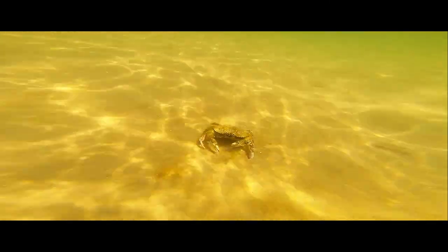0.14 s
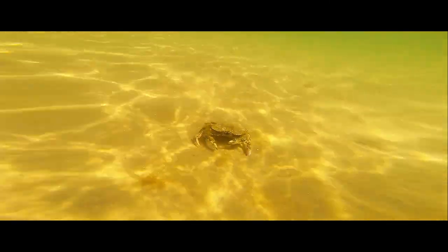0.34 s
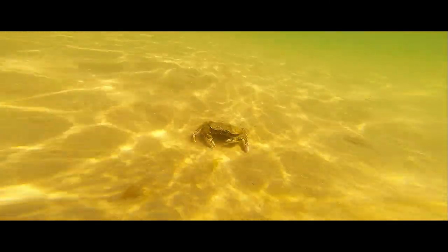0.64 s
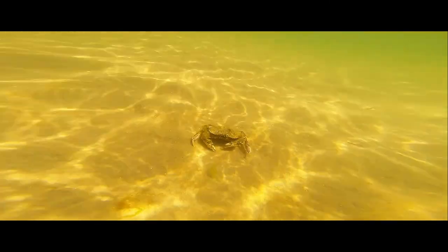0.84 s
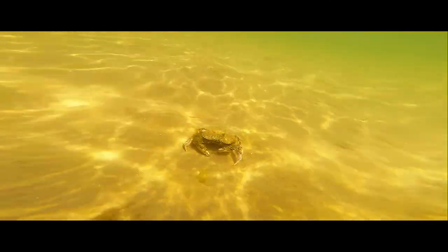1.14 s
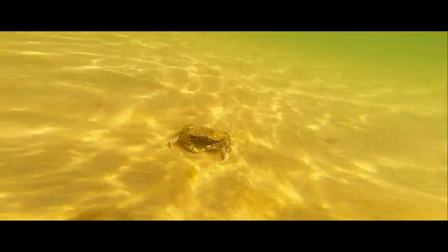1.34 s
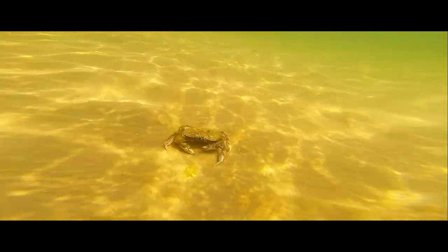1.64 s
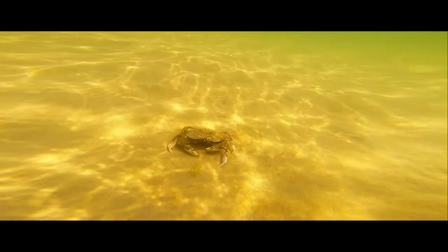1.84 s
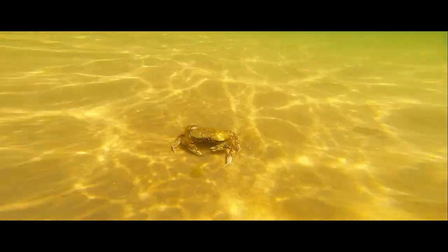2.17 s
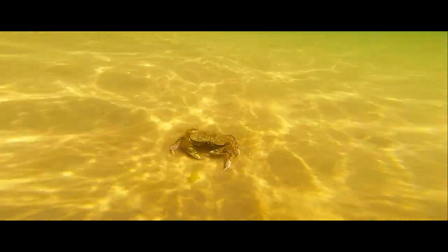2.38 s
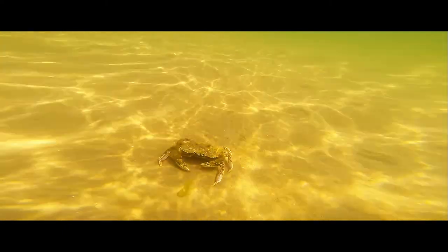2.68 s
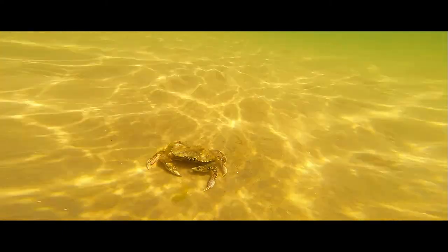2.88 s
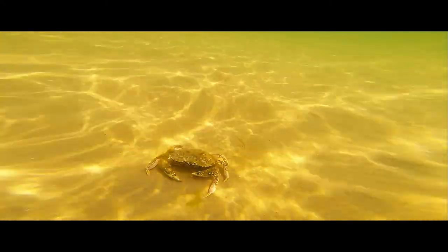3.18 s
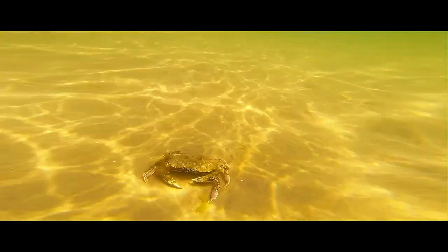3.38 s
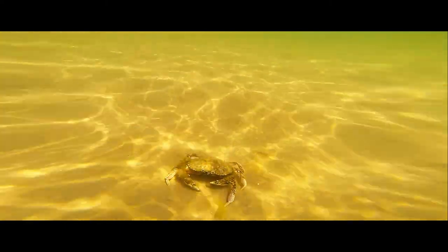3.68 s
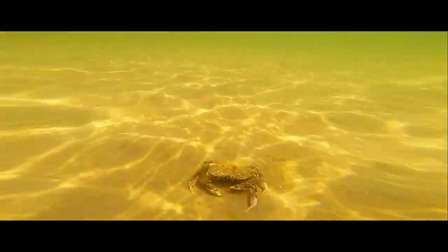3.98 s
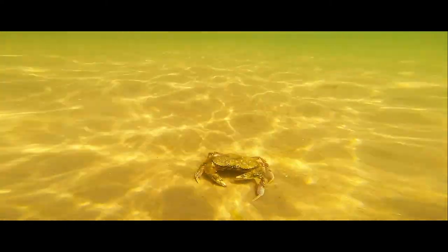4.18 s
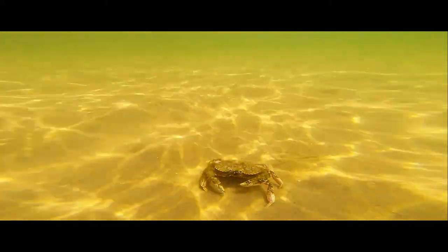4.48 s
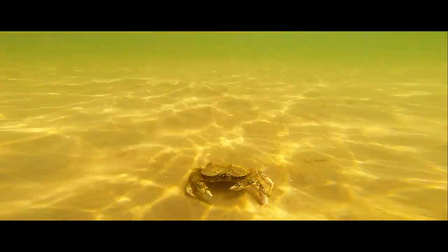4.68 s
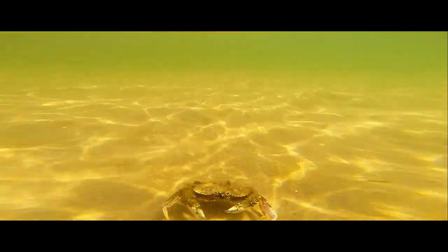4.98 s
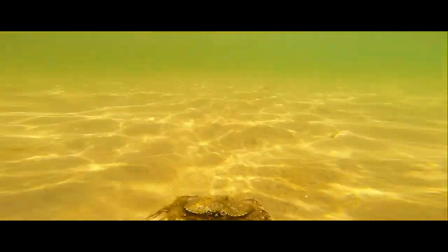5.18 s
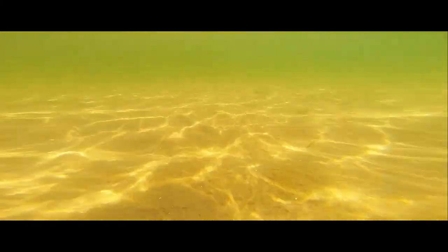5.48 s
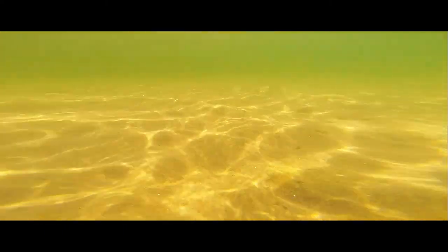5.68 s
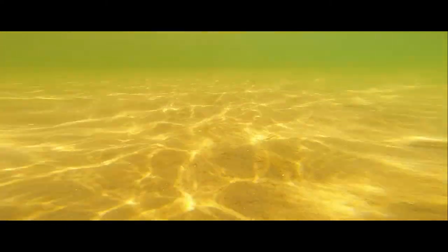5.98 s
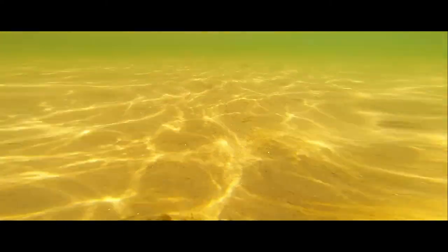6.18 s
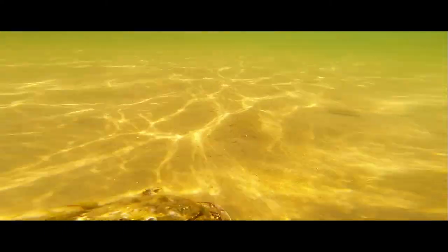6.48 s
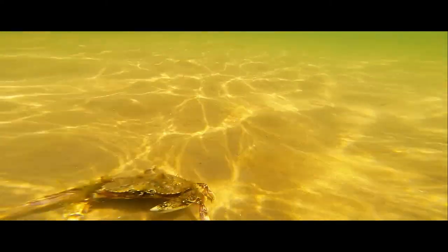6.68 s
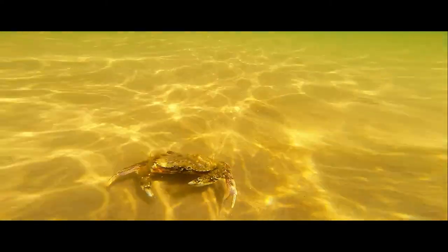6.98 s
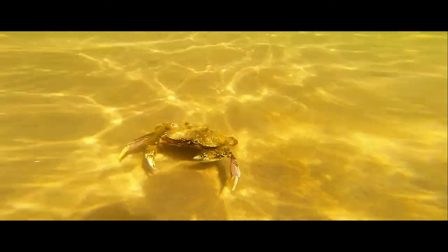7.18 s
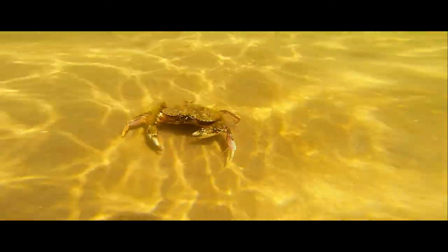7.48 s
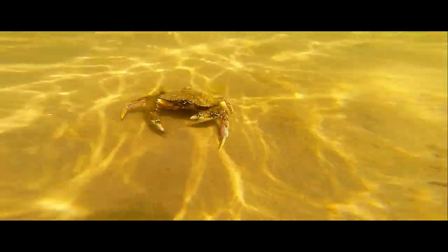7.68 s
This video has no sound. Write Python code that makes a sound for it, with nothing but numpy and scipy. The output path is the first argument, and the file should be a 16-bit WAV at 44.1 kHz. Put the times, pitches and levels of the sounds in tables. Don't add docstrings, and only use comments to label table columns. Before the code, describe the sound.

Close dry clicks and soft bumps over faint hiss and low water swell, ending in a violent rattle of plastic knocks and rubbing.

```python
import sys
import numpy as np
from scipy import signal
from scipy.fft import rfft, irfft
from scipy.io import wavfile
from scipy.ndimage import uniform_filter1d, minimum_filter1d

SR = 44100
rng = np.random.default_rng(int(sys.argv[2]) if len(sys.argv) > 2 else 0)


def invert_db(level):
    return 10 ** (np.asarray(level, dtype=float) / 20)


def put_to_file(sound):
    columns = np.atleast_2d(sound).T
    safe = np.clip(columns, -1, 1)
    whole_steps = np.round(safe * 32767)
    wavfile.write(sys.argv[1], SR, whole_steps.astype(np.int16))


N = 345303


def rms_one(x):
    return x / np.sqrt(np.mean(x ** 2) + 1e-20)


def in_time(rows):
    s, *columns = np.transpose(rows)
    return [np.interp(np.arange(N) / SR, s, c) for c in columns]


def drift(rate):
    r = np.exp(-80 * np.pi * rate / SR)
    slow = signal.lfilter([1], [1, -2 * r, r * r], rng.standard_normal(N // 40 + 2002))
    slow = rms_one(slow[2000:])
    return np.interp(np.arange(N) / 40, np.arange(len(slow)), slow)


def ring(clicks, hz, t60):
    r, w = invert_db(-60 / (t60 * SR)), 2 * np.pi * hz / SR
    return signal.lfilter([0, np.sin(w)], [1, -2 * r * np.cos(w), r * r], clicks + 1e-18)


def clicks_at(times, sizes):
    samples = np.round(np.asarray(times) * SR).astype(int)
    return np.bincount(np.minimum(samples, N - 1), sizes, N)


def soften(x, hz):
    return signal.sosfilt(signal.butter(2, hz, fs=SR, output="sos"), x)


def coloured(spectrum):
    hz, level_db = np.transpose(spectrum)
    log_hz = np.log(np.arange(1, N // 2 + 2) * SR / N)
    gain = invert_db(np.interp(log_hz, np.log(hz), level_db))
    return rms_one(irfft(rfft(rng.standard_normal(N)) * gain, N))


def fading_levels(rows):
    t = np.arange(N) / SR
    return sum(invert_db(level_db) * np.clip(np.minimum(t - start, end - t) / 0.017, 0, 1)
               for start, end, level_db in rows)


def joint(rub_db):
    # time in
    # seconds, peak in dB.
    slips = [(0.1875, -34), (0.207, -41), (0.213, -33.7), (0.2226, -42.0), (0.4129, -31),
             (0.4156, -34.5), (0.4283, -32.5), (0.431, -47), (0.4356, -43), (0.4383, -39),
             (0.4458, -41), (0.776, -51), (1.053, -44), (1.061, -42.0), (1.069, -49), (1.0771, -38.5),
             (1.1498, -43.5), (1.1681, -44), (1.1787, -40.5), (1.189, -48), (1.198, -46),
             (1.2045, -51), (1.211, -48), (1.533, -33.5), (1.542, -41), (1.585, -49.0), (1.608, -45),
             (1.6812, -40.5), (1.7, -48.0), (1.719, -46), (1.7648, -44), (1.778, -44), (3.062, -49),
             (3.072, -57), (3.085, -43.2), (3.0924, -46), (3.0983, -40), (3.1024, -52), (3.1069, -35),
             (3.115, -41.6), (3.1192, -42), (3.1253, -41), (3.1365, -38), (3.1458, -41),
             (3.1492, -42), (3.1542, -45), (3.1631, -42), (3.1666, -39), (3.1729, -39.0),
             (3.1806, -37.3), (3.1863, -33), (3.1944, -28), (3.2024, -40), (3.2054, -29.5),
             (3.2075, -36), (3.2203, -35), (3.225, -28.5), (3.2288, -36.5), (3.2332, -48),
             (3.4009, -23.5), (3.4091, -26.5), (3.4182, -32), (3.4214, -26), (3.429, -32),
                   (3.4324, -36.4), (3.4356, -38), (3.4384, -48), (3.451, -44), (3.9081, -29.2),
                   (3.9275, -37.5), (3.972, -51), (4.1695, -38), (4.193, -59), (4.216, -55),
                   (4.2915, -45.8), (4.4535, -42), (4.4712, -37.5), (4.4996, -40), (4.513, -39),
                   (4.5255, -40), (4.5405, -41), (4.5438, -43), (4.556, -42), (4.59, -47), (4.6, -36.5),
                   (4.6149, -38.5), (4.64, -43.5), (4.648, -45), (4.6621, -45), (4.678, -46.0),
                   (4.728, -40), (4.745, -35), (4.7595, -34), (4.773, -40), (4.787, -39), (4.8025, -35),
                   (4.8133, -40), (4.8276, -41.5), (4.84, -40), (4.8623, -38.5), (5.0696, -34.5),
                   (5.0895, -42.3), (5.1984, -39), (5.2361, -43), (5.241, -40.5), (5.2557, -39),
                   (5.2712, -34), (5.2871, -30), (5.3168, -34.5), (5.332, -41), (5.5733, -38.5),
                   (6.1117, -41.5), (6.128, -46), (6.468, -44.5),
             (6.7075, -42), (6.7141, -44), (6.742, -30), (6.7518, -39), (6.7615, -17), (6.7666, -17.5),
                  (6.7718, -21.5), (6.779, -22), (6.7851, -34), (6.7882, -37), (6.7922, -34),
                  (6.813, -41.0), (6.8521, -41), (6.8798, -48), (6.889, -38), (6.901, -46), (6.9419, -41.5),
                  (6.9449, -38.6), (6.9661, -32.5), (6.99, -21.5), (6.9948, -12.5), (7.0003, -3.5),
                  (7.003, -20), (7.0058, -17), (7.023, -13), (7.026, -19), (7.0376, -14), (7.0403, -2),
                  (7.0455, -13), (7.0505, -10), (7.0546, -12.5), (7.056, -11.5), (7.0592, -20.4),
                  (7.0627, -26.5), (7.0666, -24), (7.0741, -43),
             (7.0873, -40), (7.1029, -35), (7.1062, -35), (7.1112, -43.3), (7.1151, -31),
                  (7.1527, -41), (7.1582, -46.2), (7.1635, -35), (7.1666, -44), (7.1705, -32.5),
                  (7.1727, -32.5), (7.178, -46), (7.181, -29.5), (7.1898, -28.5), (7.1972, -26),
                  (7.2025, -42), (7.2086, -27), (7.2126, -33), (7.2177, -34.2), (7.2214, -34),
                  (7.2264, -41), (7.2298, -39), (7.2333, -45), (7.2368, -43), (7.2402, -42),
                  (7.2447, -45.3), (7.2712, -40), (7.2764, -37), (7.2794, -36), (7.2819, -36),
                  (7.2869, -41), (7.2917, -46), (7.2952, -37.4), (7.2999, -35.1), (7.3058, -33.5),
                  (7.319, -38.5), (7.567, -36), (7.58, -46.0), (7.591, -48.5), (7.76, -50), (7.8, -49.5),
                  (7.8145, -46),
             (6.7315, -47), (6.748, -42), (6.981, -38.5), (6.988, -30.5), (6.9925, -13.5),
                  (7.0085, -27), (7.033, -22), (7.0352, -15), (7.043, -10), (7.048, -10), (6.91, -43),
                  (6.8635, -39), (6.82, -43), (8.9, -44), (5.3, -43), (0.21, -46), (.235, -49),
                  (.4415, -44), (.451, -47), (3.56, -46)]
    # start in seconds, low walls in dB,
    # middle wall in dB, brightness in dB, top modes in dB.
    bearing_rows = [(0, -10, 6, 3, 7), (.3, -5, 7.5, 5, 9), (.422, -4, 4, 4, -4), (.7, -19, 9, 1, -3),
                    (1.0, -2, 0, 7, -6), (1.12, -1, -2, 0, -6), (1.4, -8, 3, 1, 7), (1.56, -6, 2, -12, -3),
                    (3.0, -11.5, 5, -4, -5), (3.184, -8, 6.5, 5.5, 11), (3.3, -15, -5, 5.5, -12),
                    (3.406, -3, -1.5, 1, -12), (3.8, -5.5, 1, 2, -10), (4.1, -19, 2, -2, -3),
                    (4.4, -4.5, 0.5, -4, -10), (4.7, 1, -7, -3.5, -10), (4.855, -3, 4, 9, 14),
                    (5.0, -5, 3, 0, -8), (5.22, -3.5, -3.5, -1, -13), (5.5, -4, 0.5, -7, -3),
                    (6.6, -11, -3, -14, -8), (6.757, -11.5, 2, -5.5, -5), (6.776, 0.5, -4, -7.5, -8),
                    (6.93, -6, -0.5, -2.5, -2), (6.985, -8, -10.5, -9, -7.5), (6.998, -10, 6, -2, -7),
                    (7.015, -16, 2, -2, -1.5), (7.03, -11, -4, -3.5, -4.5), (7.038, -16.5, 3, 2, 7),
                    (7.043, -10, 6, 3, -0.5), (7.052, -10.5, 2.5, 1, -6), (7.058, -1.5, 1, -4, -5),
                    (7.08, -6.5, -5, -1, -11), (7.155, -4.5, 6, 8.5, 5), (7.204, -1.5, 3.5, 7.5, 3),
                    (7.26, -2, -1, 3, -11), (7.5, -7, -11, -2.5, -5), (7.7, 3, -21, 8, 1)]
    # pitch in Hz, level in dB, t60 in seconds.
    low_walls = [(344, -11.5, 0.004), (556, -2, 0.019), (672, -2.5, 0.022), (854, -1, 0.013)]
    high_walls = [(1250, -17, 0.017), (1464, -4, 0.02), (1900, -4, 0.011), (2225, -10.5, 0.022),
                  (2490, -8, 0.018), (2918, -11.5, 0.01), (3860, -25, 0.012), (4080, -21, 0.011),
                  (5030, -25.5, 0.01), (5600, -32, 0.0063), (6940, -26.5, 0.012), ]
    low_signs, high_signs = [1, -1, 1, 1], [1, 1, -1, 1, -1, 1, -1, -1, 1, -1, 1]
    # start in seconds, end in seconds, level in dB.
    gurgles = [
        (1.8, 3.2, -81),
        (2.505, 2.3, -58.5),
        (2.68, 2.83, -66),
        (4.24, 4.3, -61),
        (5.5, 4.1, -54),
        (5.23, 5.35, -62),
        (6.93, 6.975, -50.5),
        (6.09, 6.15, -60.5),
        (3.46, 3.55, -63.5),
        (1.145, 1.262, -64),
    ]
    s, peak_db = np.transpose(slips)
    since, *bearing = np.transpose(bearing_rows)
    row = np.maximum(np.searchsorted(since, s) - 1, 0)
    low_db, middle_db, bright_db, top_db = np.array(bearing)[:, row]
    s, peak_db = s - 0.00017, peak_db + 1
    top_db = top_db + 0.2 * np.clip(peak_db + 25.5, -20, 0)
    tiny_sizes = invert_db(2.1 * rng.exponential(1, N).clip(0, 2.5)) * rng.choice([-1, 1], N)
    tiny = (rng.random(N) < 450 / SR) * tiny_sizes
    scatter_db = 1.4 * rng.normal(0, 1, (len(s), 15))
    drag = scraping() * tiny
    dull_drag = soften(drag, 2300)
    gurgle = fading_levels(gurgles)
    murmur = (invert_db(rub_db - 7.5) + gurgle) * tiny + invert_db(-6.0) * drag
    low, high = np.zeros(N), np.zeros((2, N))
    for k, (hz, level_db, t60) in enumerate(low_walls):
        strikes = clicks_at(s, invert_db(peak_db + low_db + level_db + scatter_db[:, k]))
        low += low_signs[k] * ring(strikes + invert_db(level_db) * murmur, hz, t60)
    for k, (hz, level_db, t60) in enumerate(high_walls):
        tilt_db = [0, 0, middle_db, 1.3 * bright_db, bright_db, bright_db, top_db][min(k, 6)]
        strikes = clicks_at(s, invert_db(peak_db + level_db + tilt_db + scatter_db[:, 4 + k]))
        high[k // 6] += high_signs[k] * ring(strikes + invert_db(level_db + 2.0) * dull_drag, hz, t60)
    low += ring(gurgle * tiny, low_walls[2][0], 0.044)
    walls = soften(soften(low, 1400), 2400)
    walls = walls + soften(soften(soften(high[0], 3600) + high[1], 3800), 4200)
    return signal.sosfilt(signal.butter(2, 300, "high", fs=SR, output="sos"), walls)


def scraping():
    # start in seconds, end in seconds, level in dB.
    drags = [(-.02, 0.024, -49), (0.745, 0.787, -61), (1.147, 1.235, -59), (1.438, 1.563, -59.5),
             (1.558, 1.657, -58), (1.666, 1.837, -64), (3.055, 3.196, -51), (3.55, 3.583, -55.5),
             (3.906, 4.022, -53.5), (4.142, 4.316, -57), (4.629, 4.693, -60), (5.965, 5.993, -54),
             (6.087, 6.155, -62.5), (6.18, 6.276, -62), (6.698, 6.977, -51.5), (7.093, 7.144, -53),
             (7.56, 7.607, -63), (7.745, 7.851, -56)]
    return invert_db(-85) + fading_levels(drags)


def grip(rub_db):
    # time in seconds, peak in dB.
    thumps = [(4.9196, -32.5), (4.9919, -31), (5.31, -30), (5.4945, -27.5), (5.523, -29.5), (5.6597, -27),
              (5.7258, -35.5), (5.748, -32), (5.8243, -35.5), (5.881, -31.5), (6.007, -30), (6.139, -32.5),
              (6.209, -31), (6.2532, -31.5), (6.299, -34), (6.463, -34.5), (6.712, -35), (6.778, -18),
              (6.8363, -28.5), (6.868, -30), (6.988, -33), (6.9994, -23), (7.057, -29), (7.089, -35),
              (7.158, -34.5), (7.7528, -18), (7.76, -30), (7.772, -29)]
    # time in seconds, peak in dB.
    weaker_thumps = [(0.427, -54), (0.552, -59), (0.92, -59), (0.993, -53), (1.051, -42.5), (1.143, -46),
                     (1.198, -47), (1.26, -46), (1.295, -45), (1.492, -47), (1.715, -40), (1.77, -42.5),
                     (1.861, -39.5), (1.966, -47), (2.008, -46), (2.131, -40.5), (2.253, -48), (2.294, -57),
                     (2.41, -52), (2.458, -44), (2.488, -43.5), (2.561, -47), (2.664, -50), (2.729, -44),
                     (2.808, -44.5), (2.864, -45.5), (2.968, -36), (3.087, -44.5), (3.199, -46), (3.398, -38.5),
                     (3.519, -51), (3.616, -52), (3.706, -42), (3.779, -49), (3.905, -44), (3.982, -41),
                     (4.104, -39), (4.153, -45), (4.248, -38), (4.479, -54), (4.533, -48), (4.582, -38.5),
                     (4.771, -50), (4.802, -48), (4.838, -41),
                     (0.001, -40.5), (0.1767, -42), (4.962, -42), (5.4121, -38), (5.574, -47), (5.676, -46),
                          (6.0628, -40), (6.172, -39), (7.0286, -46), (7.211, -37.5)]
    grip_hz = 152.7
    s, peak_db = np.transpose(thumps + [(s, 2.5 + level_db) for s, level_db in weaker_thumps])
    jolts = soften(soften(clicks_at(s - .0006, -invert_db(peak_db)), 250), 210)
    shove = invert_db(-6) * ring(jolts, 95, .055)
    pushes = rng.standard_normal(N) * invert_db(2.2 * drift(25))
    stirring = invert_db(-60.5 + 0.57 * (rub_db + 64)) * rms_one(ring(soften(pushes, 220), grip_hz, 0.07))
    return ring(jolts, grip_hz, 0.15) + shove + stirring


def pops():
    # time in seconds, peak in dB, pitch in Hz.
    air_pops = [(3.857, -38.5, 3020), (3.859, -43.5, 3500), (3.858, -53, 4140), (4.108, -40, 594),
                (4.442, -51, 480), (4.737, -39, 576), (5.115, -41.5, 910), (5.957, -40, 697),
                (5.975, -40.5, 700), (6.098, -40, 657), (6.286, -38, 523), (6.2875, -30.5, 780),
                (6.289, -32, 1520), (6.2934, -30, 1480), (6.949, -30, 274), (6.318, -32.5, 700),
                (6.318, -41.5, 1500)]
    out = np.zeros(N)
    for s, peak_db, hz in air_pops:
        push = soften(soften(clicks_at([s], [invert_db(peak_db)]), 1.7 * hz), 0.74 * hz)
        out += ring(push, hz, 0.033 + 10.6 / hz)
    return out


def groans():
    # start in seconds, end in seconds, level in dB, pitch in Hz.
    air_groans = [
        (4.285, 4.358, -61, 470),
        (4.35, 4.406, -61, 480),
        (4.4, 4.47, -58, 490),
        (6.83, 6.97, -56, 330),
        (6.856, 6.969, -48.5, 434),
        (7.145, 7.268, -56.5, 302.5),
        (7.782, 7.86, -51.5, 300),
        (4.17, 4.3, -69, 430),
    ]
    return sum(fading_levels([row[:3]]) * rms_one(ring(rng.standard_normal(N), row[3], 0.03))
               for row in air_groans)


def bubble():
    start_s, start_hz, rise_per_s, fade_s = 4.733, 480, 66, 0.0046
    t = np.clip(np.arange(N) / SR - start_s, 0, .03)
    turns = start_hz * np.expm1(rise_per_s * t) / rise_per_s
    swell_and_fade = np.e * t / fade_s * np.exp(-(t / fade_s) ** 2)
    return invert_db(-34.5) * swell_and_fade * np.sin(2 * np.pi * turns)


def ticks():
    # time in seconds, peak in dB.
    grain_ticks = [
        (1.7554, -54),
        (3.8574, -54),
        (4.8628, -52),
        (5.57, -53),
        (6.287, -58),
        (7.241, -49),
        (7.5032, -50),
    ]
    s, peak_db = np.transpose(grain_ticks)
    hits = clicks_at(s, invert_db(peak_db))
    return invert_db(6.5) * ring(hits, 5200, 0.0027) - invert_db(-3.0) * ring(hits, 8800, 0.0034)


def spray():
    start_s, end_s, band_hz = 6.88, 7.22, (8500, 11900)
    t = np.arange(N) / SR
    grains = rng.standard_normal(N) * invert_db(4.0 * drift(40))
    band = signal.sosfilt(signal.butter(2, band_hz, "band", fs=SR, output="sos"), grains)
    fade = np.clip(np.minimum(t - start_s, end_s - t) / .06, 0, 1)
    return invert_db(-74) * fade * rms_one(band)


def swell(swell_db):
    # frequency in Hz, level in dB per Hz.
    swell_spectrum = [(10, 2), (22, 2), (45, 1), (75, -11.5), (110, -8), (180, -18), (300, -52.5),
                      (2000, -110)]
    return invert_db(swell_db + 1.8 * drift(25.0)) * coloured(swell_spectrum)


def circuit():
    # start in seconds, length in seconds, kind.
    memory_writes = [(.56, .105, 0), (.665, .013, 1), (.745, .355, 1), (1.126, .112, 1), (1.25, .048, 0),
                     (1.398, .038, 2), (3.205, .06, 0), (3.346, .055, 0), (3.481, .065, 1),
                     (3.614, .062, 1), (3.76, .105, 0), (3.9, .048, 1), (4.031, .052, 1), (4.197, .054, 1),
                     (4.32, .052, 1), (4.483, .05, 1), (4.599, .05, 1), (4.746, .037, 1), (4.883, .038, 2),
                     (5.45, .118, 0), (5.586, .115, 1), (5.738, .12, 1), (5.867, .243, 1), (6.134, .044, 1),
                     (6.279, .038, 2), (7.235, .112, 0), (7.347, .12, 1), (7.492, .118, 1), (7.645, .12, 1),
                     (7.789, .04, 1)]
    # pulses per second, level in dB, coil pitch in Hz.
    write_kinds = [
        (140, -77.5, 10440),
        (138, -76.5, 10450),
        (265, -72, 10600),
    ]
    blip_starts = [0.01, .147, .263, .439, 1.297, 1.439, 1.539, 1.682, 1.804, 1.952, 2.082, 2.233, 2.363,
                   2.489, 2.634, 2.763, 2.932, 3.052, 4.925, 5.015, 5.178, 5.301, 6.176, 6.325, 6.4, 6.518,
                   6.667, 6.802, 6.962, 7.083]
    # pitch in Hz, rms level in dB.
    blip_tones = [(5630, -77.5), (9884, -82.5), (11278, -74)]
    out, t = np.zeros(N), np.arange(N) / SR
    for s, length, kind in memory_writes:
        per_s, level_db, coil_hz = write_kinds[kind]
        at, count = round(s * SR), int(length * per_s) + 1
        wander = .006 * np.cumsum(rng.standard_normal(count)) / np.sqrt(count)
        beats = np.arange(count) + wander
        pulses = np.zeros(round((length + .01) * SR))
        pulses[np.abs(beats * SR / per_s).astype(int)] = 1
        high = ring(ring(pulses, coil_hz, 0.004), coil_hz, 0.0055)
        upper = ring(ring(pulses, 10900, 0.0036), 11200, 0.005) + .15 * ring(pulses, 9600, .004)
        low = ring(pulses + 0.081 * rng.standard_normal(len(pulses)), 6520, 0.01)
        coils = rms_one(high) + invert_db(-6) * rms_one(upper) + invert_db(1) * rms_one(low)
        out[at:at + len(pulses)] += invert_db(level_db) * coils[:N - at]
    on_off = clicks_at(blip_starts, None) - clicks_at(np.add(blip_starts, .027), None)
    gate = uniform_filter1d(np.cumsum(on_off), size=40)
    tones = sum(np.sqrt(2) * invert_db(level_db) * np.sin(2 * np.pi * hz * t) for hz, level_db in blip_tones)
    return out + gate * tones


def hiss():
    # frequency in Hz, level in dB per Hz.
    hiss_spectrum = [(110, -36), (180, -15), (213, -6.5), (338, -9.5), (634, -11.5), (1080, -18.5),
                     (1460, -17.5), (4500, -25.5), (8470, -33), (11000, -35.5), (12600, -40.5),
                     (13200, -34.5), (15300, -40.5)]
    return invert_db(-59.5) * coloured(hiss_spectrum)


def scene():
    # time in seconds, swell in dB, dull rubbing of the joint in dB.
    water = [(0.0, -51, -73), (0.3, -53.5, -63), (4.01, -48, -59), (4.6, -50, -54.5), (5.34, -52.5, -65.5),
             (6.04, -53.5, -65.5), (6.43, -42, -59.5), (6.61, -52, -62), (6.78, -35, -47.5),
             (6.93, -41.5, -41.5), (7.13, -50, -39.5), (7.3, -43.5, -50.5), (7.44, -50, -72),
             (7.79, -42.5, -60), (7.83, -55, -44)]
    swell_db, rub_db = in_time(water)
    handling = joint(rub_db) + grip(rub_db)
    air = pops() + groans() + bubble()
    sand = ticks() + spray()
    return (handling + air + sand + swell(swell_db) + circuit() + hiss())[None]


def flicker(x):
    dropouts = [.2, .43, .7, 1.055, 1.53, 1.57, 3.2, 3.41, 3.9, 4.78, 4.83, 4.99, 5.19, 6.47, 6.745, 7.0,
                7.03, 7.565]
    hz, s, bins = signal.stft(x, SR, nperseg=2048)
    kept = np.repeat(rng.random((129, len(s))) < .55, 8, axis=0)[:len(hz)]
    kept[:, np.abs(s[:, None] - np.array(dropouts)).min(axis=1) < .025] = False
    gain = np.where(kept | (hz[:, None] < 12800), 1, .08)
    return signal.istft(bins * gain, SR)[1][..., :N]


def roll_off(x):
    return signal.sosfilt(signal.butter(12, 15190, fs=SR, output="sos"), x)


def record(dry):
    wanted = np.minimum(1, .86 / (np.abs(dry) + 1e-9))
    held = dry * uniform_filter1d(minimum_filter1d(wanted, size=129), size=65)
    return roll_off(flicker(held))


dry = scene()
out = record(dry)
put_to_file(out)
```